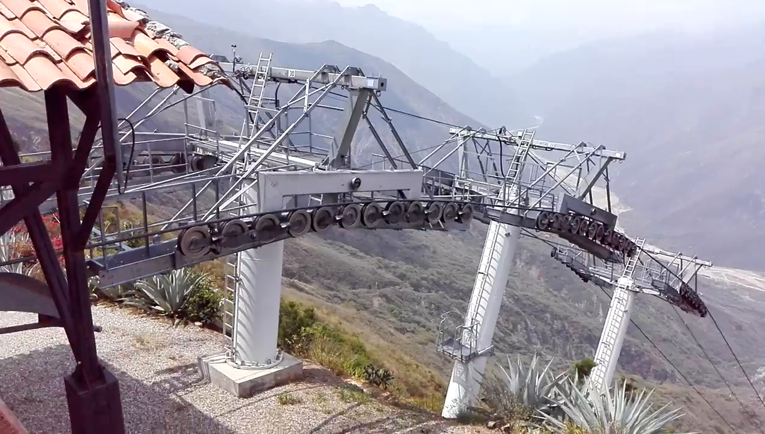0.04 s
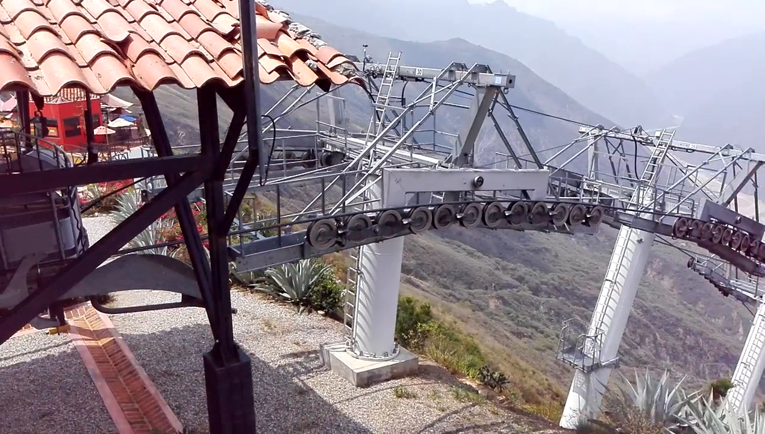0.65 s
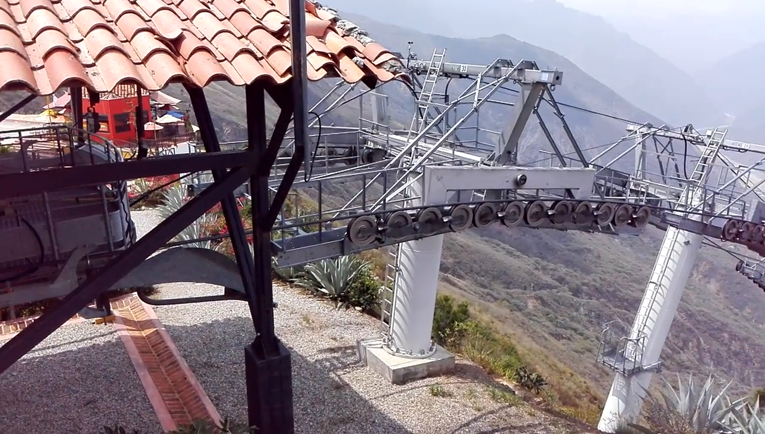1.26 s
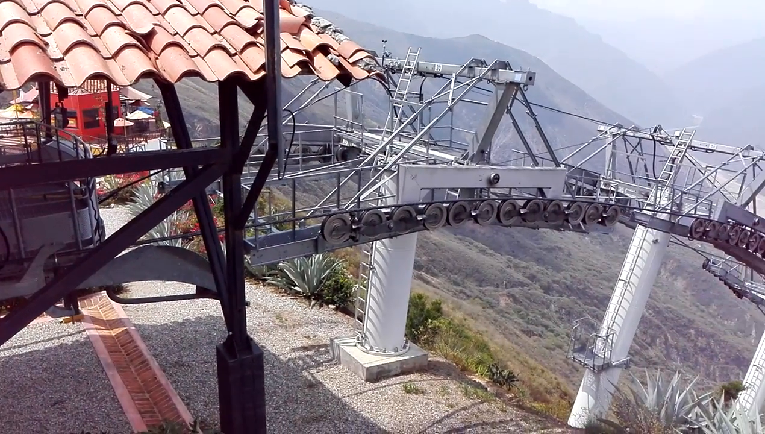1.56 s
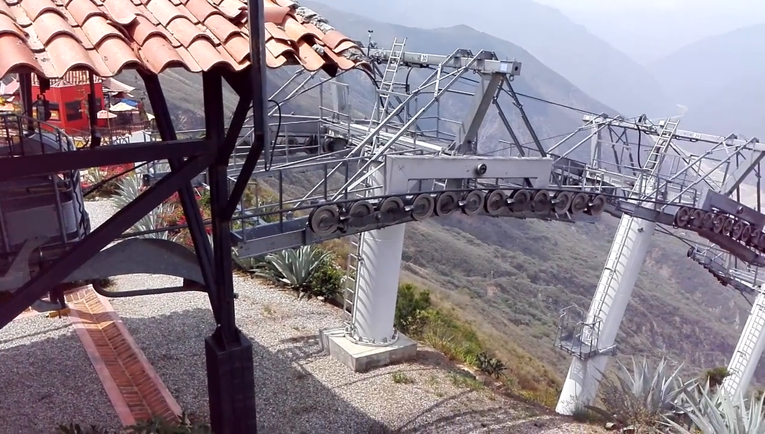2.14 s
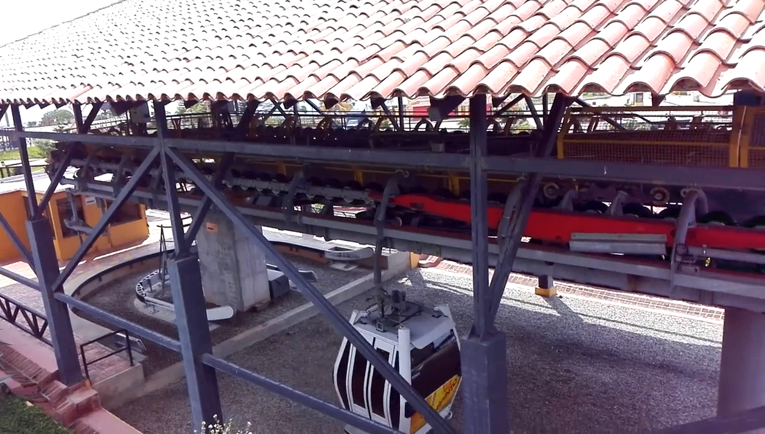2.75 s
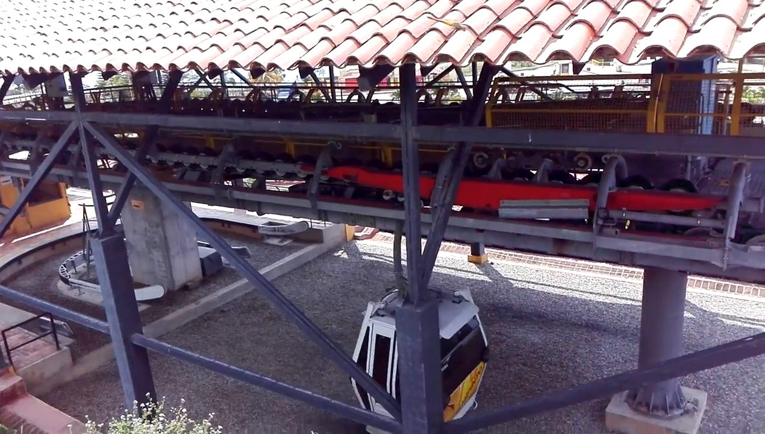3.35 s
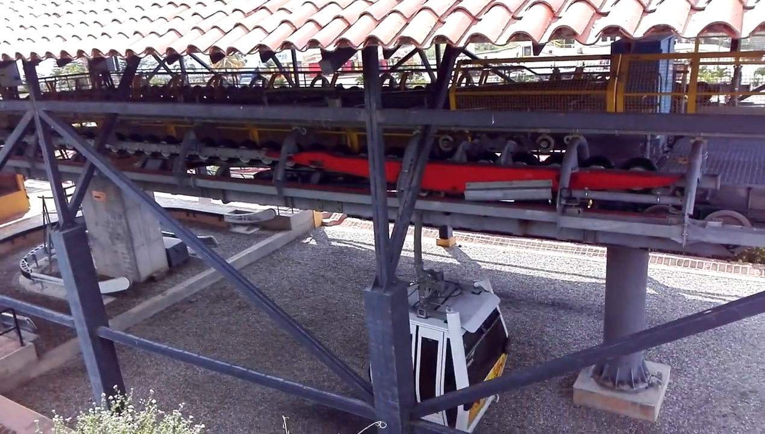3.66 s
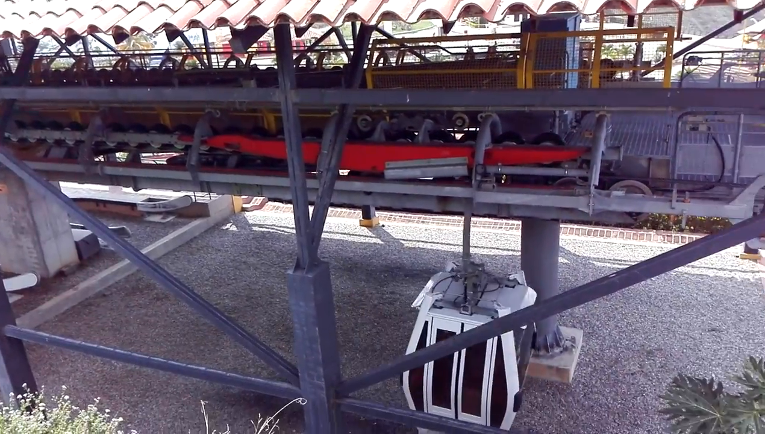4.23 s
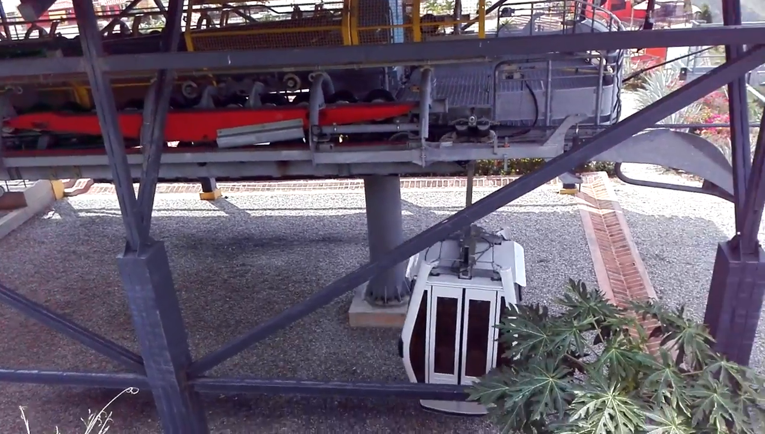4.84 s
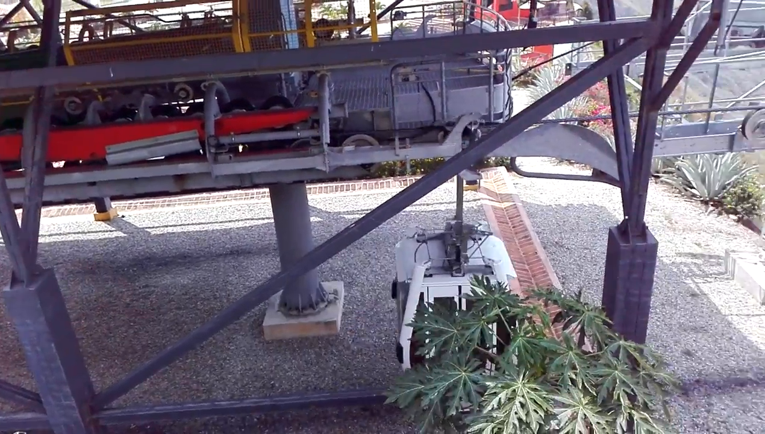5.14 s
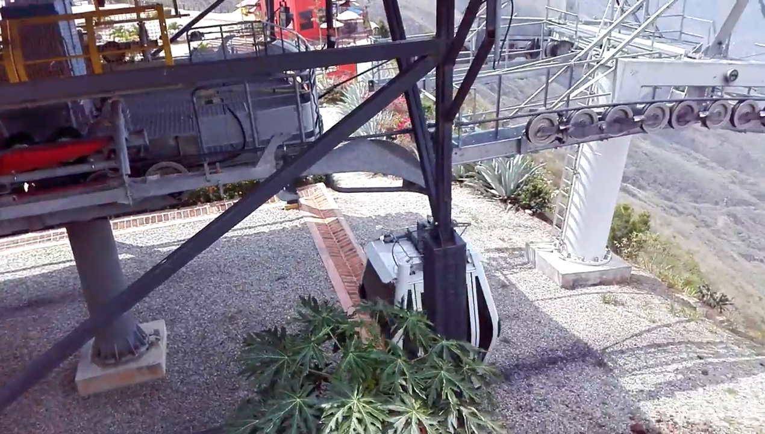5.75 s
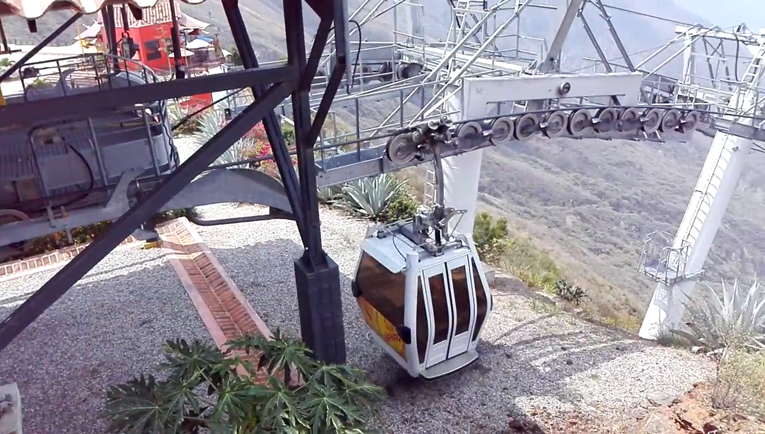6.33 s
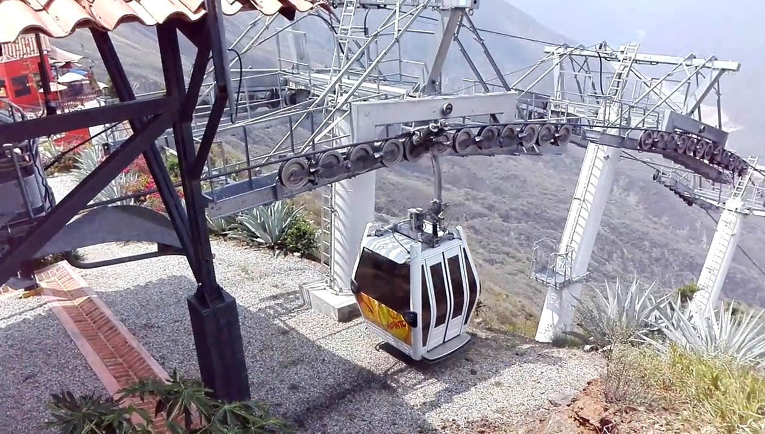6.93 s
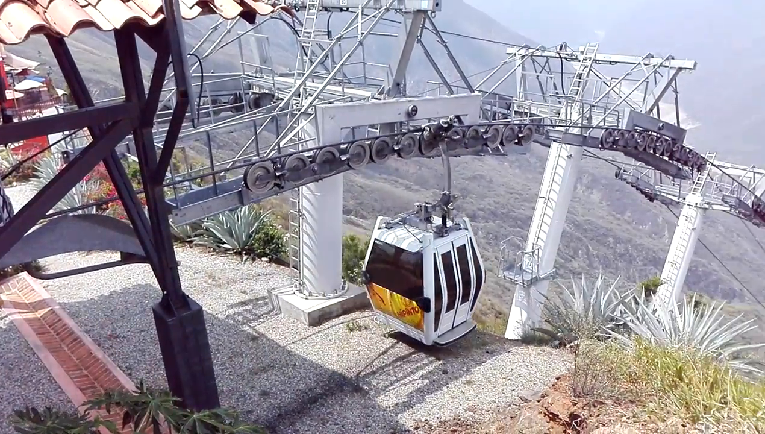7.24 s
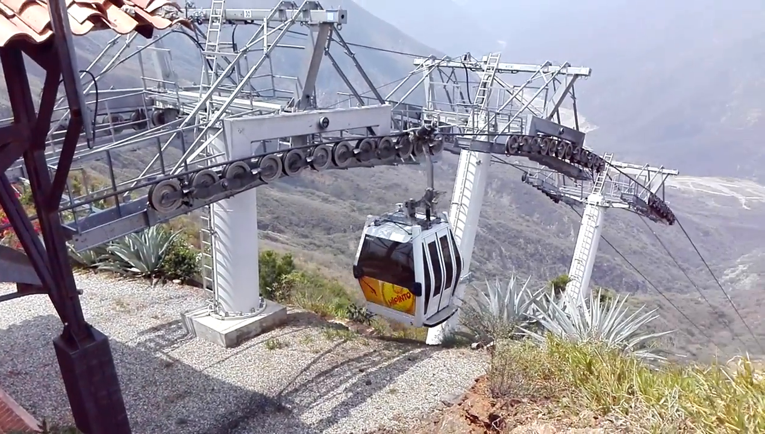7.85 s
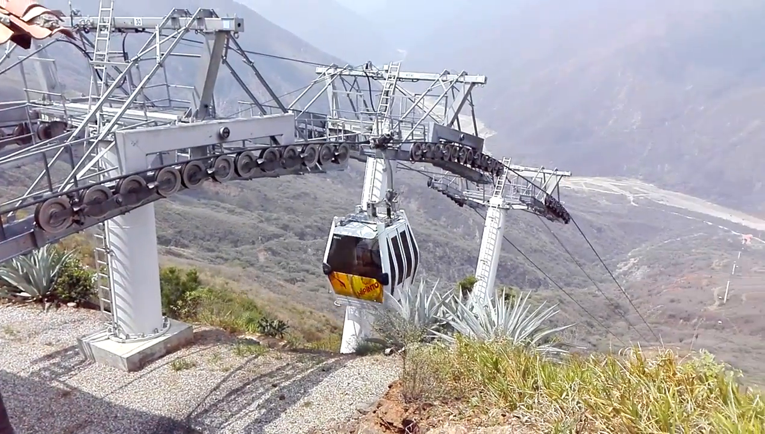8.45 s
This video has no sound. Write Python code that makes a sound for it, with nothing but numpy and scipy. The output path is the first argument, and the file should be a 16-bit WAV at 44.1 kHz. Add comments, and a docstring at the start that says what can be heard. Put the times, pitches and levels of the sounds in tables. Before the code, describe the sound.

Wind buffets the microphone at an open-sided cableway station, over the continuous drone and rush of the drive and wheels. After a brief dropout, a cabin comes rolling along, scraping a rail as a wheel squeals sharply. A burst of metallic knocks and short groans follows, then a light, rhythmic chatter as the cabin runs out across the rollers and the wind strengthens.

```python
"""Cableway station in wind

In an open-sided hillside station the drive hums under a steady rush of rope and wheels. A cabin rolls
along the tyre conveyor with a scrape and a short wheel squeal, its grip clatters shut on the rope, and it
leaves over a row of sheaves in faint pulses. Gusts buffet the microphone; early on the sound drops out
and fades back in."""
import sys
import numpy as np
from scipy import signal
from scipy.fft import rfft, irfft, next_fast_len
from scipy.io import wavfile
from scipy.ndimage import uniform_filter1d

SR = 44100
rng = np.random.default_rng(int(sys.argv[2]) if len(sys.argv) > 2 else 0)


def wav_out(sig):
    """Save sig, one row per channel (or a flat mono array), as 16-bit PCM at SR to the path in sys.argv[1]."""
    wavfile.write(sys.argv[1], SR, np.round(np.clip(np.atleast_2d(sig).T, -1, 1) * 32767).astype(np.int16))


N = 374409
TIME_S = np.arange(N) / SR
FFT_SIZE = next_fast_len(N, real=True)
FREQ_HZ = np.maximum(np.fft.rfftfreq(FFT_SIZE, 1 / SR), 1)


def from_db(db):
    """Decibels to gain."""
    return 10 ** (np.asarray(db) / 20)


def envelope(points):
    """Gain per sample from time_s, level_db points."""
    time_s, level_db = np.transpose(points)
    return from_db(np.interp(TIME_S, time_s, level_db))


def colour(points):
    """Gain per frequency from freq_hz, gain_db points."""
    freq_hz, gain_db = np.transpose(points)
    return from_db(np.interp(np.log(FREQ_HZ), np.log(freq_hz), gain_db))


def resonances(modes):
    """Gain per frequency of a body with steep-sided modes."""
    return sum(from_db(db) / (1 + 2 * ((FREQ_HZ - hz * hz / FREQ_HZ) / (2 * width_hz)) ** 2)
               for hz, width_hz, db in modes)


def ripple(depth_db, spacing_hz):
    """Fine spectral ripple from steelwork reflections, shallower in the treble."""
    wiggle = np.interp(FREQ_HZ / spacing_hz, np.arange(SR), rng.standard_normal(SR))
    return from_db(depth_db * wiggle / (1 + (FREQ_HZ / 6000) ** 2))


def drift(rate_hz):
    """Slow random signal, standard deviation 1."""
    step = 20
    white = rng.standard_normal(N // step)
    freq_hz = np.fft.rfftfreq(len(white), step / SR)
    slow = irfft(rfft(white) / (1 + (freq_hz / rate_hz) ** 2))
    return np.interp(np.arange(N) / step, np.arange(len(slow)), slow / slow.std())


def flutter(depth_db, rate_hz):
    """Randomly wavering gain, mean power 1."""
    gain = from_db(depth_db * np.clip(drift(rate_hz), -2, 2))
    return gain / np.sqrt(np.mean(gain ** 2))


# freq_hz, side_to_mid_db
STEREO_WIDTH = [(3700, -100), (4200, -19), (5000, -12.5), (6000, -9.5), (7000, -7), (9500, -4.7),
                (14000, -4.7)]


def noise(gain):
    """Shaped stereo noise, mid rms 1; only the treble differs between the ears."""
    mid, side = rfft(rng.standard_normal((2, FFT_SIZE))) * gain
    mid = irfft(mid, FFT_SIZE)[:N]
    side = irfft(side * colour(STEREO_WIDTH), FFT_SIZE)[:N]
    return np.array([mid + side, mid - side]) / mid.std()


def contact(start_s, length_s, rise_s, t60_s, level_db=0):
    """Contact envelope: linear rise, exponential decay after length_s."""
    force = np.zeros(N)
    sounding = (TIME_S > start_s) & (TIME_S < start_s + length_s + 2 * t60_s)
    age_s = TIME_S[sounding] - start_s
    decay = np.exp(-np.log(1000) * np.maximum(age_s - length_s, 0) / t60_s)
    force[sounding] = np.minimum(age_s / rise_s, 1) * decay
    return from_db(level_db) * force


# fundamental, swelling as the listener turns: time_s, level_db
HUM_LEVEL = [(.25, -40.5), (.9, -49), (2.1, -50.5), (3.0, -36.5), (3.7, -39), (5.0, -38.5), (5.8, -35),
             (6.6, -39), (8.49, -35.5)]
# multiple, level_db
HUM_OVERTONES = [(2, -54.5), (3, -50.5), (4, -53.5), (5, -57.5), (6, -58.5), (7, -62)]


def drive(pitch_hz=56.45):
    """The drive hums at one speed; each overtone wavers on its way through the frame."""
    turns = np.cumsum(pitch_hz + .2 * drift(rate_hz=1.2)) / SR
    hum = envelope(HUM_LEVEL) * np.sin(2 * np.pi * turns) * flutter(depth_db=.6, rate_hz=5)
    for multiple, level_db in HUM_OVERTONES:
        phase = 2 * np.pi * (multiple * turns + rng.random()) + .69 * drift(rate_hz=6.2)
        hum += from_db(level_db) * np.sin(phase) * flutter(depth_db=2, rate_hz=4)
    return np.sqrt(2) * hum


# freq_hz, gain_db
RUSH_SPECTRUM = [(30, 8), (100, 6.5), (200, 10), (380, 1.5), (530, -7), (700, -3.5), (1300, 0), (2100, -2),
                 (3200, -4.5), (4200, -3.5), (5350, 1.5), (6600, -6), (8900, -20.5), (12000, -26.5)]
# weaker beside the station's flank: time_s, level_db
RUSH_LEVEL = [(0, -40.2), (2.1, -39.5), (3.1, -44), (4.0, -46), (5.5, -41.5), (6.6, -39.7), (8.49, -40.6)]
# freq_hz, width_hz, gain_db
STATION_MODES = [(1000, 28, -14.5), (1310, 14, -8), (1510, 33, -14.5), (1970, 25, -10)]


def rope_and_wheels():
    """Many turning wheels merge in a rush, coloured by the station's narrow modes."""
    gain = colour(RUSH_SPECTRUM) * (1 + resonances(STATION_MODES)) * ripple(depth_db=1, spacing_hz=24)
    return envelope(RUSH_LEVEL) * noise(gain) * flutter(depth_db=.7, rate_hz=22)


# freq_hz, width_hz, gain_db
FRAME_MODES = [(290, 100, -1), (357, 50, -2.5), (405.6, 19, -5)]


def frame(idle_db=-55.5):
    """The steel frame drones under the bare rope, louder as the carriage drums on it."""
    drumming = contact(start_s=3.5, length_s=1.7, rise_s=.4, t60_s=3.5, level_db=-42)
    return np.hypot(drumming, from_db(idle_db)) * noise(resonances(FRAME_MODES))


# time_s, strength_db
BREEZE = [(0, -46), (.55, -61), (1.5, -41.5), (3.1, -42.5), (4.0, -48), (4.7, -51), (5.3, -42), (6.4, -46),
          (6.8, -35.5), (8.49, -34.5)]
# peak_s, length_s, strength_db
GUSTS = [(.92, .1, -40), (1.293, .1, -37.5), (1.63, 0.064, -34), (3.233, .14, -24), (4.93, .08, -31.5),
         (5.18, .06, -29.5), (5.578, 0.083, -25), (5.885, .06, -28), (6.734, .14, -30), (6.923, 0.085, -25),
         (7.17, 0.15, -31), (7.567, 0.066, -24), (7.66, 0.045, -28.5), (8.064, .17, -27.5),
         (8.3, 0.095, -24)]
# wind spectra: freq_hz, gain_db
EDDY_SPECTRUM = [(5, -2.5), (18, 1), (42, -1.5), (65, -11.5), (110, -26), (300, -74)]
BUFFET_SPECTRUM = [(25, 0), (55, 3), (85, 3), (130, -3), (220, -15.5), (330, -21), (520, -35.5),
                   (1000, -47.5), (3000, -84.5)]
THUMP_SPECTRUM = [(40, -13), (110, 1), (180, -1.5), (320, -10.5), (520, -35), (2000, -84)]


def wind():
    """Breeze and bell-shaped gusts press on the microphone; harder gusts reach higher frequencies."""
    power = (envelope(BREEZE) * flutter(depth_db=2.5, rate_hz=9)) ** 2
    for peak_s, length_s, strength_db in GUSTS:
        near = np.abs(TIME_S - peak_s) < 2 * length_s
        bell = np.exp(-(2 * (TIME_S[near] - peak_s) / length_s) ** 2)
        power[near] += from_db(strength_db) ** 2 * bell
    strength = np.sqrt(power)
    push = strength * flutter(depth_db=2, rate_hz=36)
    eddies = from_db(-1.3) * strength * noise(colour(EDDY_SPECTRUM))
    buffet = from_db(-2) * push * noise(colour(BUFFET_SPECTRUM))
    thumps = from_db(17.5) * push ** 2 * noise(colour(THUMP_SPECTRUM))
    return eddies + buffet + thumps


# track spectra: freq_hz, gain_db
TYRE_SPECTRUM = [(40, 0), (85, 10.5), (200, 1), (460, 1.5), (590, -8), (750, -3), (950, 1.5), (1400, 1.5),
                 (2300, -2.5), (3100, -1), (4200, -6.5), (5000, -2.5), (5850, 1), (7000, -8.5),
                 (8600, -18.5), (10200, -21), (12000, -30)]
COUPLING_SPECTRUM = [(40, 4.5), (85, 11), (200, 3), (450, 2), (620, -6.5), (780, -.7), (1080, .3),
                     (1350, 1.5), (2000, -3.5), (3000, -6.5), (4000, -7.5), (5400, -2.5), (7000, -12.5),
                     (9000, -25.5), (14000, -35)]
EXIT_SPECTRUM = [(40, 2), (85, 9.5), (220, 10.5), (330, 0), (480, -3), (600, -10), (1100, -4.5), (1550, 2),
                 (1900, -1.5), (2750, -0.5), (3700, -2.5), (4420, -2.5), (5450, 3), (6500, -5.3),
                 (7800, -8), (9100, -21.5), (11200, -17), (13000, -29)]
# track modes: freq_hz, width_hz, gain_db
TYRE_MODES = [(3040, 50, -8.5), (5300, 40, -9.5)]
COUPLING_MODES = [(825, 37, -10), (1122, 35, -14), (1300, 50, -11)]
EXIT_MODES = [(1620, 120, -8), (3240, 65, -11), (4400, 130, 0), (7660, 120, -6)]


def carriage():
    """The rolling carriage excites the conveyor tyres, coupling rail and exit rail in turn."""
    on_tyres = contact(start_s=2.8, length_s=1.09, rise_s=.29, t60_s=.5, level_db=-35.8)
    on_coupling = contact(start_s=3.78, length_s=1.3, rise_s=.24, t60_s=1, level_db=-37)
    on_exit = contact(start_s=4.82, length_s=1.28, rise_s=.72, t60_s=3.8, level_db=-38.5)
    rolling = 0
    for force, spectrum, modes in ((on_tyres, TYRE_SPECTRUM, TYRE_MODES),
                                   (on_coupling, COUPLING_SPECTRUM, COUPLING_MODES),
                                   (on_exit, EXIT_SPECTRUM, EXIT_MODES)):
        gain = colour(spectrum) * (1 + resonances(modes)) * ripple(depth_db=2.1, spacing_hz=22)
        rolling += force * noise(gain) * flutter(depth_db=1, rate_hz=13)
    return rolling


# start_s, length_s, rise_s, t60_s, level_db
SHOE_RUBS = [(2.99, 0.19, .16, .7, -39.5), (3.0, .86, .2, .4, -43), (3.635, .075, 0.037, .25, -37.3)]
# freq_hz, width_hz, gain_db
GUIDE_RAIL_MODES = [(1760, 120, -5), (1985, 170, 0), (2260, 180, -4)]


def guide_shoe():
    """The shoe scrapes along a ringing rail, pressing harder at each end."""
    pressure = np.sqrt(sum(contact(*rub) ** 2 for rub in SHOE_RUBS))
    return pressure * flutter(depth_db=1.6, rate_hz=45) * noise(resonances(GUIDE_RAIL_MODES))


def friction_tones(notes, wobble_hz, wobble_rate_hz, t60_s):
    """Friction sustains one mode per note at an unsteady pitch."""
    tones = np.zeros(N)
    for start_s, length_s, pitch_hz, level_db in notes:
        force = contact(start_s, length_s, rise_s=.011, t60_s=t60_s, level_db=level_db)
        sounding = force > 0
        turns = np.cumsum(pitch_hz + wobble_hz * drift(wobble_rate_hz)[sounding]) / SR
        tones[sounding] += force[sounding] * np.sin(2 * np.pi * turns)
    return np.sqrt(2) * tones


# start_s, length_s, pitch_hz, level_db
SQUEALS = [(3.08, 0.34, 5400, -46), (3.11, .05, 8130, -53), (3.172, .028, 5380, -34.5),
           (3.172, .03, 7650, -42), (3.18, .03, 10067, -62), (3.22, .04, 6740, -50),
           (3.23, .05, 8100, -51.5), (3.235, .09, 7600, -51), (3.26, .025, 5365, -35),
           (5.235, .05, 2240, -43), (5.24, .03, 1580, -48), (7.115, .016, 3950, -43)]
# freq_hz, width_hz, gain_db
WHEEL_RIM_MODES = [(5440, 350, 1), (6750, 250, -4), (7900, 550, -6.5), (10900, 900, -14.5)]


def wheel_squeals():
    """Slipping wheels and sheaves squeal high and rough; the first slip rings a wheel rim."""
    tones = friction_tones(SQUEALS, wobble_hz=41.9, wobble_rate_hz=171, t60_s=.15)
    slip = contact(start_s=3.07, length_s=.18, rise_s=.3, t60_s=.35, level_db=-43.5)
    rim = slip * noise(resonances(WHEEL_RIM_MODES))
    return (tones + rim) * flutter(depth_db=2.4, rate_hz=90)


# start_s, length_s, pitch_hz, level_db
GROANS = [(3.465, .07, 463, -44), (3.945, .05, 390, -37), (4.13, .06, 358, -42), (4.64, .045, 373, -34),
          (4.72, .09, 378, -38), (4.885, .035, 305, -30), (4.93, .04, 266, -33), (4.945, .035, 416, -35)]


def beam_groans():
    """Beams groan as the carriage loads them."""
    return friction_tones(GROANS, wobble_hz=10, wobble_rate_hz=90, t60_s=.16)


# freq_hz, width_hz, gain_db
FITTING_MODES = [(6300, 900, 0), (8000, 1200, -4), (11000, 2000, -9)]


def fittings(start_s=4.02, ticks_per_s=10, t60_s=.054, gain_db=-51):
    """Loose fittings tick at random once the carriage is on the coupling rail."""
    knocks = (rng.random(N) < ticks_per_s / SR) * rng.uniform(.3, 1, N) * (TIME_S > start_s)
    pole = np.exp(-np.log(1000) / (t60_s * SR))
    ringing = signal.lfilter([1], [1, -pole], knocks + 1e-18)
    return from_db(gain_db) * ringing * noise(resonances(FITTING_MODES))


# start_s, t60_s, jaw_db, lever_db, frame_db
GRIP_KNOCKS = [(4.64, 0.39, -46, -43, -47), (4.72, .36, -34, -44, -41), (4.782, 0.4, -33.5, -47, -53),
               (4.908, 0.35, -34, -40.5, -35), (4.946, 0.11, -55, -36, -41), (4.983, .25, -51, -37.5, -55),
               (5.232, .25, -39.5, -38, -53.5), (6.492, .06, -33, -32.5, -55),
               (7.122, .07, -38, -42.5, -57)]
# grip parts: freq_hz, width_hz, gain_db
JAW_MODES = [(3450, 500, 8.5), (3970, 240, -4), (5520, 760, 9.5), (6600, 300, 4), (7600, 1070, -4)]
LEVER_MODES = [(1430, 400, 2.5), (1820, 320, -2), (2300, 1200, -8)]


def grip():
    """The grip closes and meets the sheaves; each knock rattles jaw, lever and frame under the roof."""
    clatter = 0
    for part, modes in enumerate((JAW_MODES, LEVER_MODES, FRAME_MODES)):
        force = sum(contact(start_s, length_s=.004, rise_s=.0084, t60_s=t60_s, level_db=parts_db[part])
                    for start_s, t60_s, *parts_db in GRIP_KNOCKS)
        body = resonances(modes) * ripple(depth_db=5, spacing_hz=43.6)
        clatter += force * noise(body) * flutter(depth_db=1, rate_hz=82)
    return clatter


# sheave parts: freq_hz, width_hz, gain_db
SHEAVE_BODY_MODES = [(1430, 200, -3), (2000, 70, 2), (2400, 260, 3), (2750, 280, 5.5), (3180, 240, 3.5),
                     (3760, 200, 5.5)]
SHEAVE_RIM_MODES = [(3820, 100, 0)]


def sheaves(first_s=6.37, period_s=.172, count=12):
    """Sheaves whirr under the rope; the grip chatters across each, ringing each rim louder than the last."""
    whirr_start_s, whirr_rise_s, whirr_db = 6, .5, -54
    rattle_db, jolt_db, settle_s = -45.8, 3, .44  # harder until the grip settles on the rope
    ring_db, growth_db_per_s = -66.5, 10.5
    whirr = from_db(whirr_db) * np.clip((TIME_S - whirr_start_s) / whirr_rise_s, 0, 1)
    power, ring = whirr ** 2, 0
    for elapsed_s in period_s * np.arange(count):
        force = contact(first_s + elapsed_s, length_s=.088, rise_s=.017, t60_s=.21)
        power += (from_db(rattle_db + jolt_db * np.exp(-elapsed_s / settle_s)) * force) ** 2
        ring += from_db(ring_db + growth_db_per_s * elapsed_s) * force
    body = resonances(SHEAVE_BODY_MODES) * ripple(depth_db=3, spacing_hz=31)
    chatter = flutter(depth_db=2.5, rate_hz=55)
    return (np.sqrt(power) * noise(body) + ring * noise(resonances(SHEAVE_RIM_MODES))) * chatter


def scene():
    """Station, departing cabin and wind."""
    rolling = frame() + carriage()
    friction = guide_shoe() + wheel_squeals() + beam_groans()
    rattles = grip() + fittings() + sheaves()
    return drive() + rope_and_wheels() + wind() + rolling + friction + rattles


# start_s, end_s
DROPOUTS = [(1.563, 1.583), (2.096, 2.234), (2.252, 2.885)]
# time_s, gain_db
FADE_IN = [(2.885, -19.5), (2.92, -13), (2.98, -8), (3.04, -4), (3.08, 0.5)]


def record(dry, cutoff_hz=14300):
    """The sound drops out three times, then fades back in; a steep low-pass cuts the top."""
    gate = np.ones(N)
    for start_s, end_s in DROPOUTS:
        gate *= (TIME_S < start_s) | (TIME_S > end_s)
    fade = np.where(TIME_S > DROPOUTS[-1][0], envelope(FADE_IN), 1)
    gated = dry * fade * uniform_filter1d(gate, size=40)
    lowpass = signal.ellip(12, .1, 80, cutoff_hz, fs=SR, output="sos")
    return signal.sosfilt(lowpass, gated + 1e-18)


dry = scene()
out = record(dry)
wav_out(out)
```